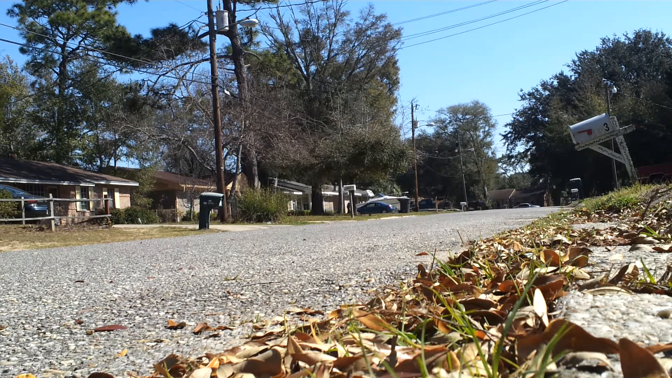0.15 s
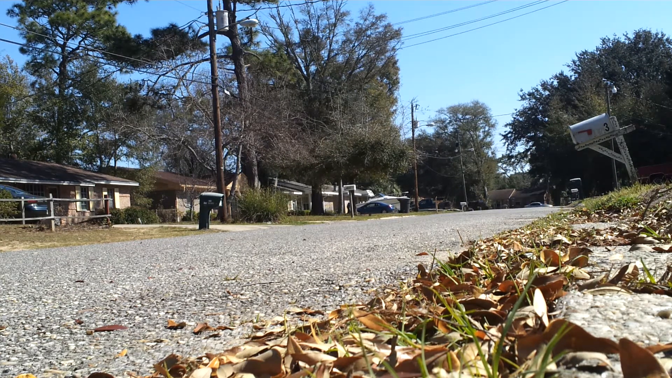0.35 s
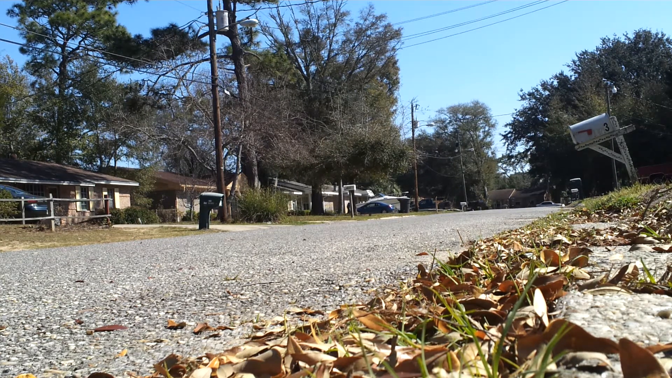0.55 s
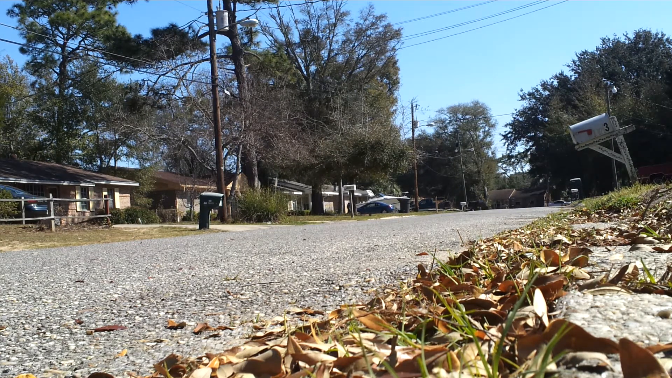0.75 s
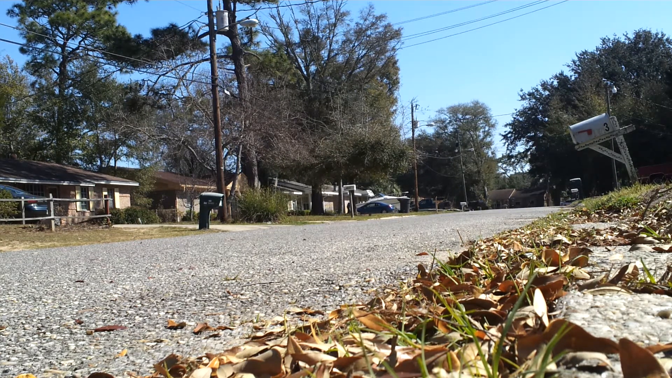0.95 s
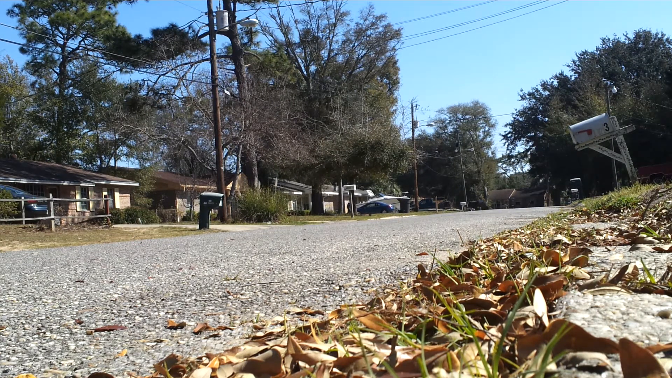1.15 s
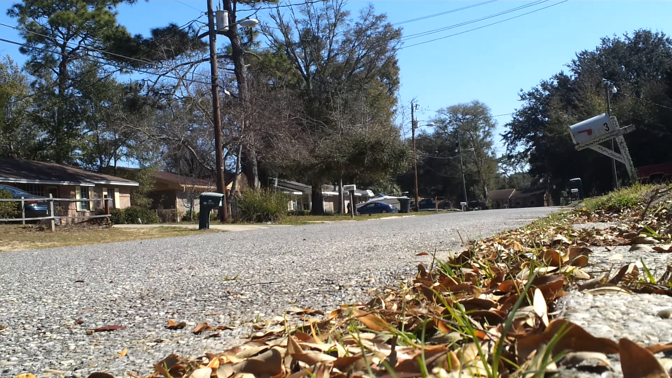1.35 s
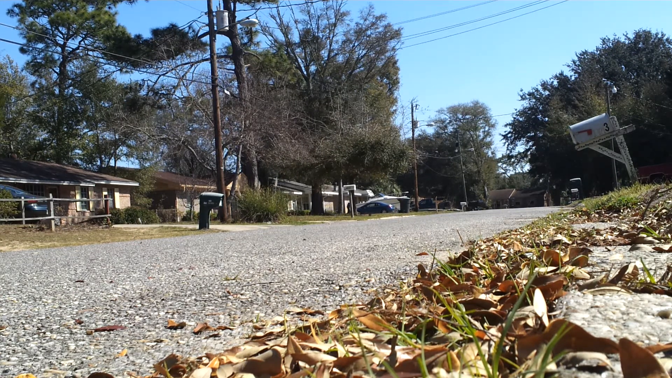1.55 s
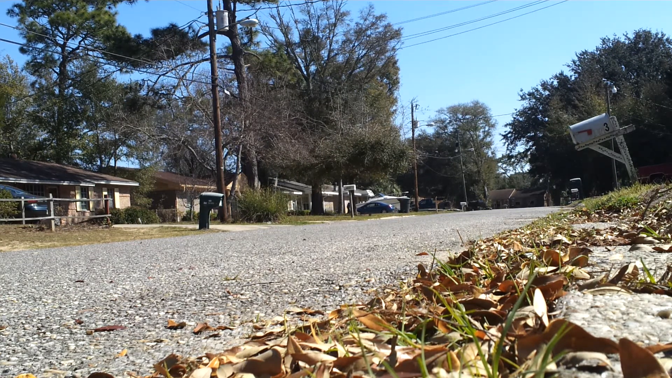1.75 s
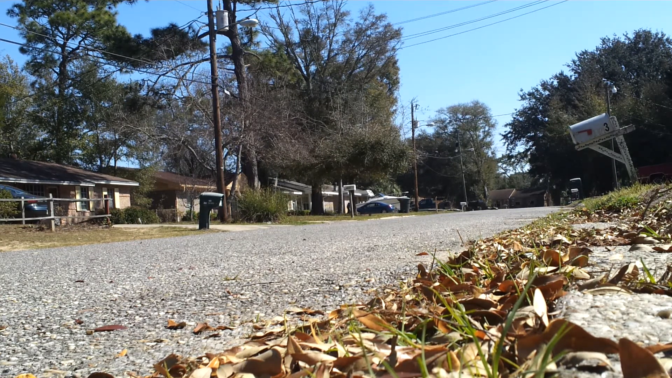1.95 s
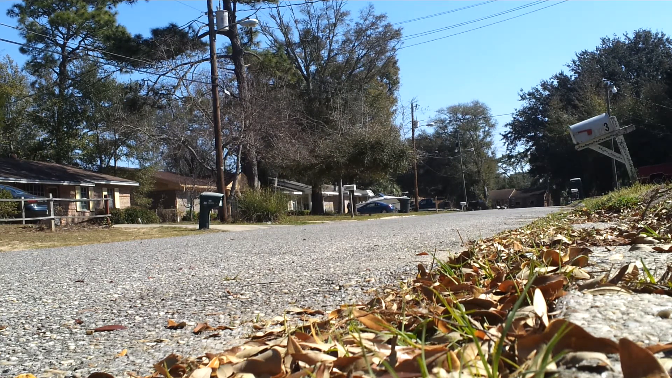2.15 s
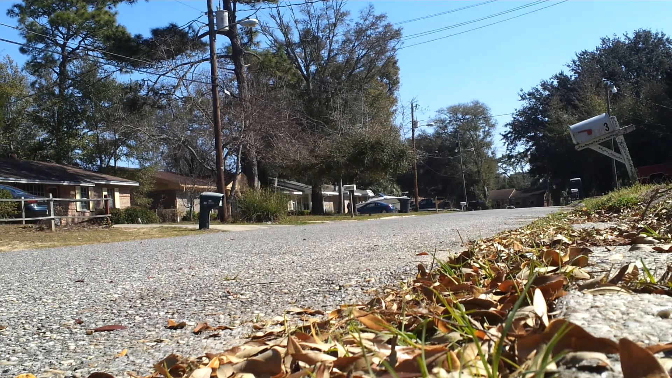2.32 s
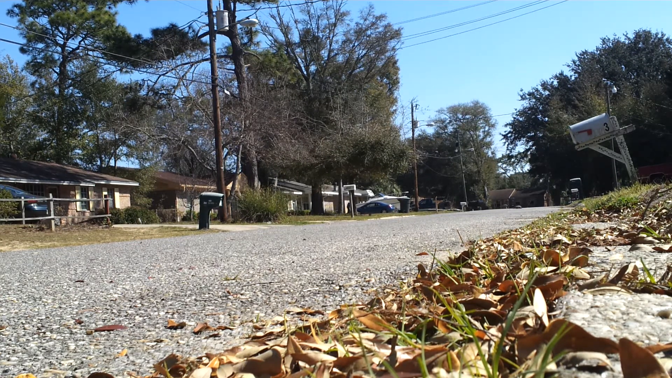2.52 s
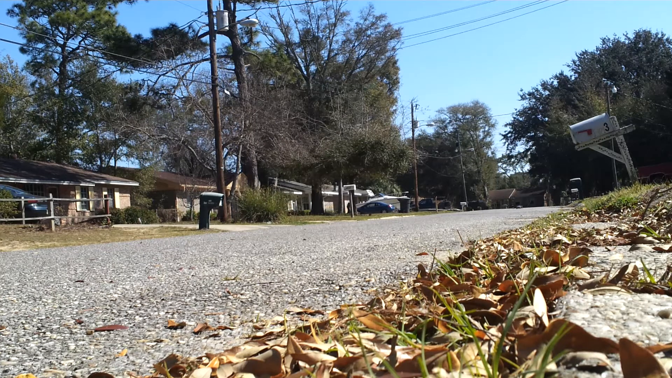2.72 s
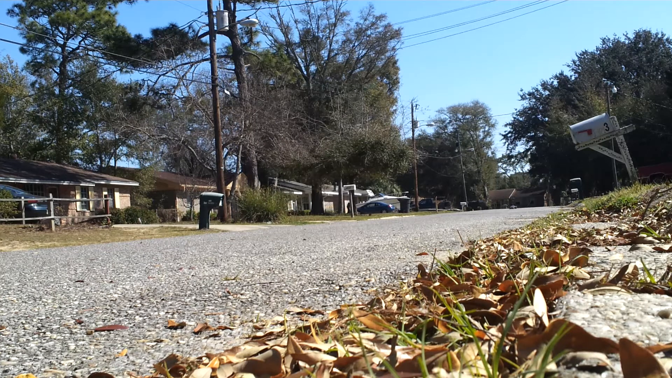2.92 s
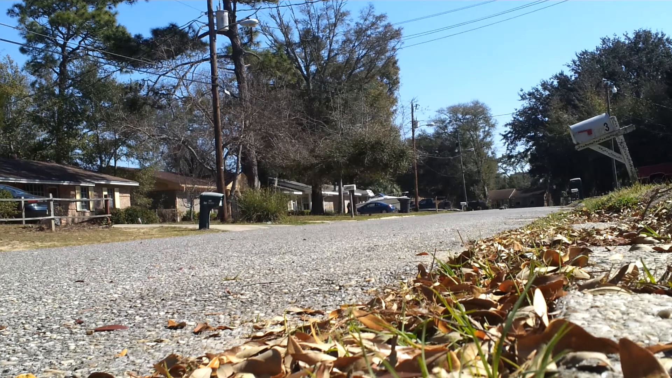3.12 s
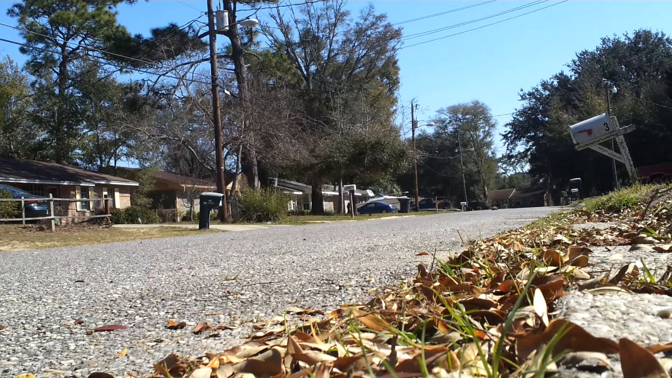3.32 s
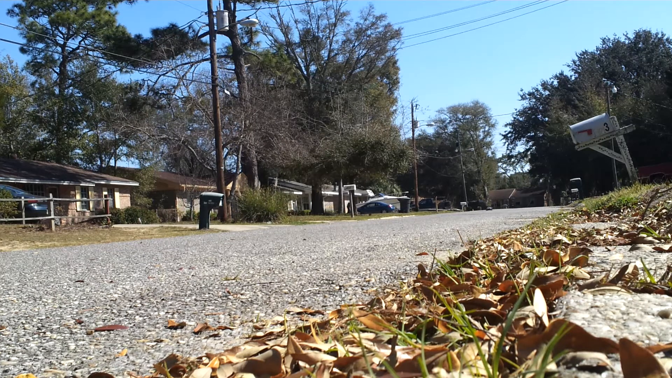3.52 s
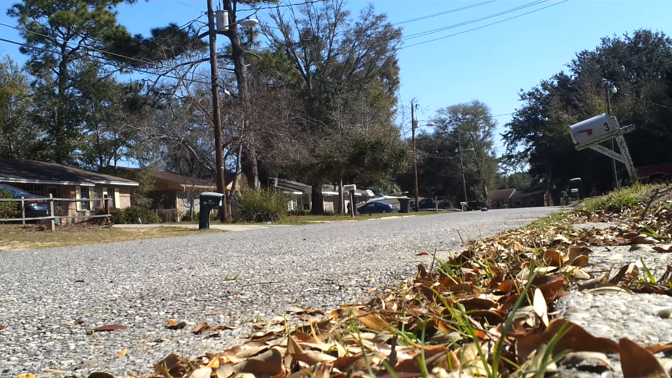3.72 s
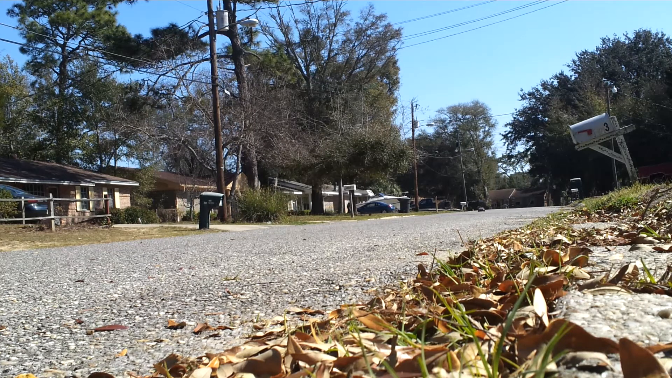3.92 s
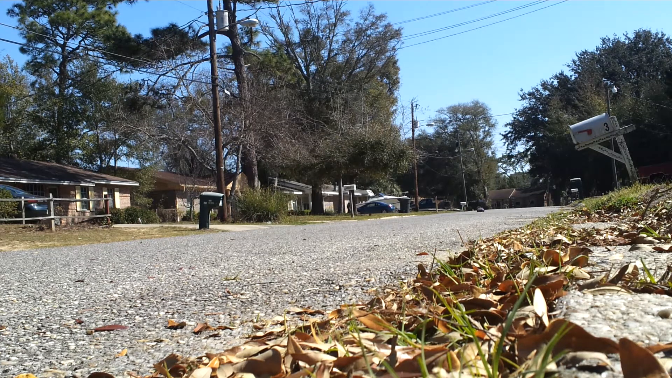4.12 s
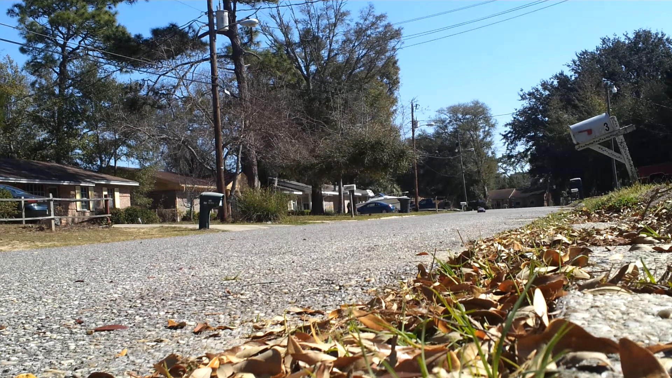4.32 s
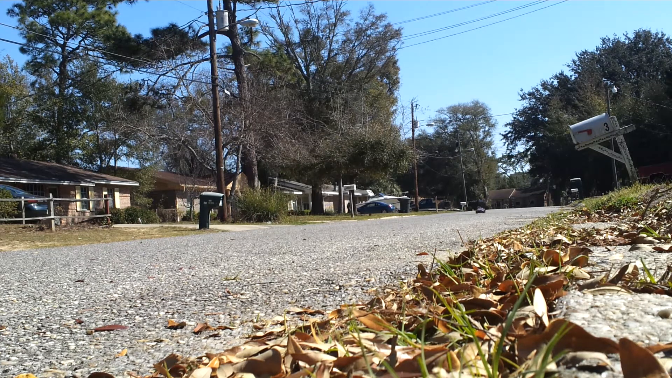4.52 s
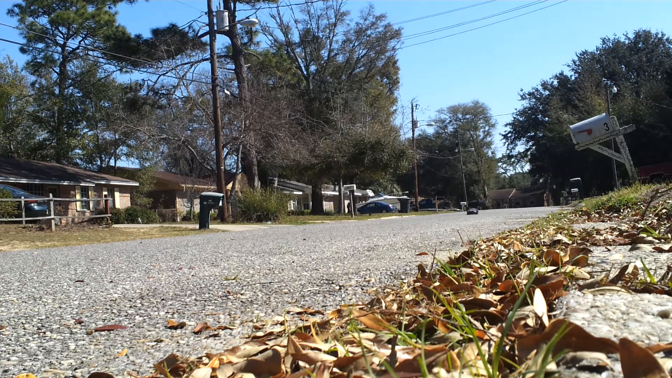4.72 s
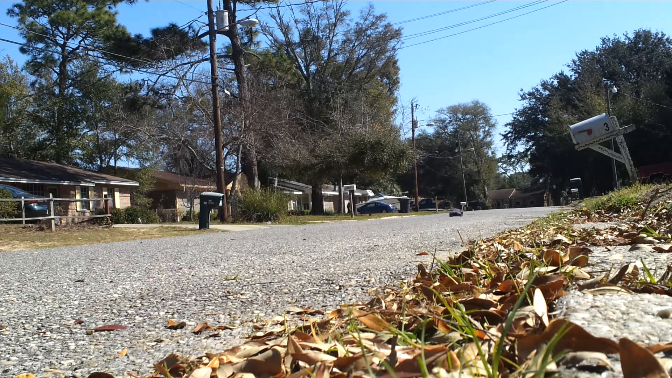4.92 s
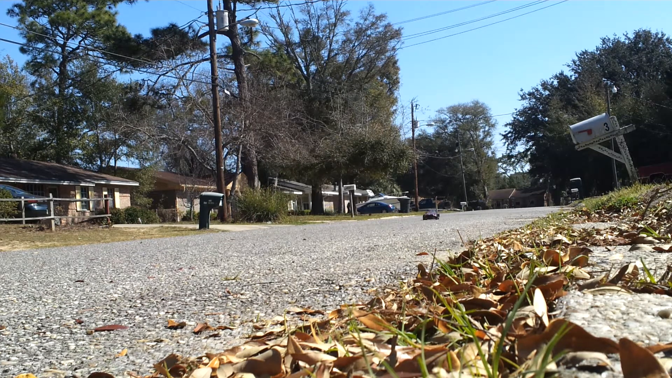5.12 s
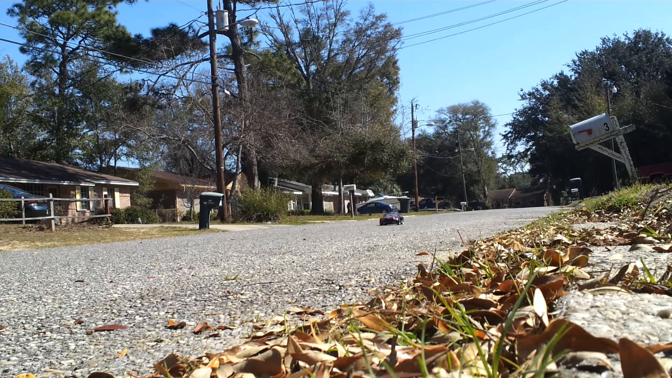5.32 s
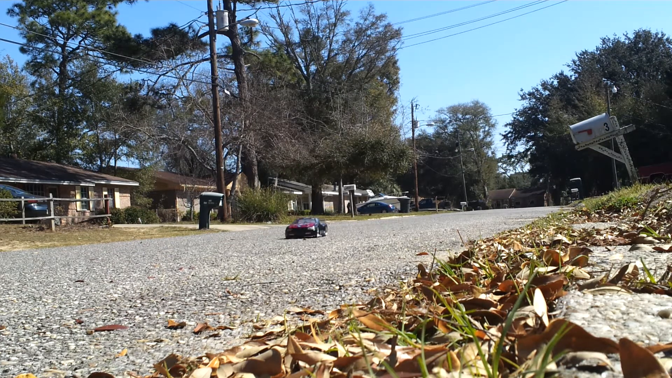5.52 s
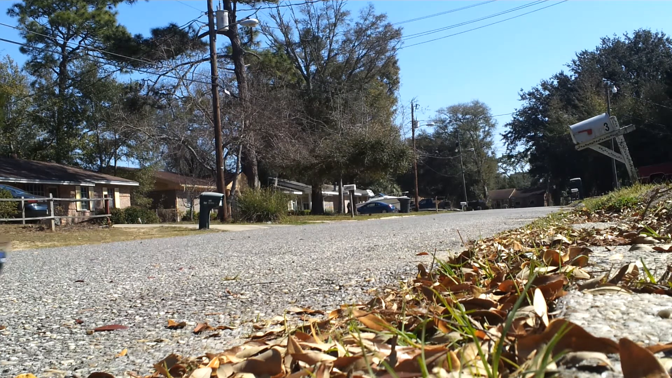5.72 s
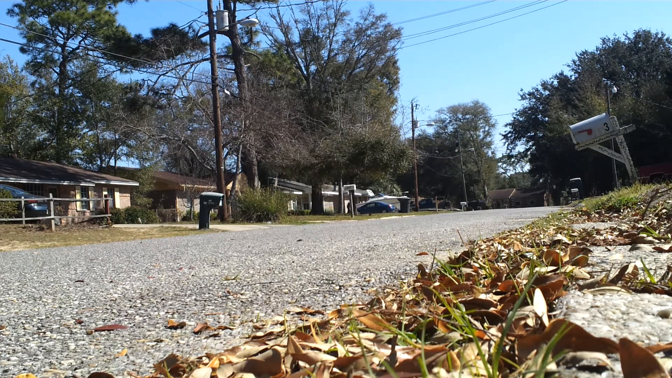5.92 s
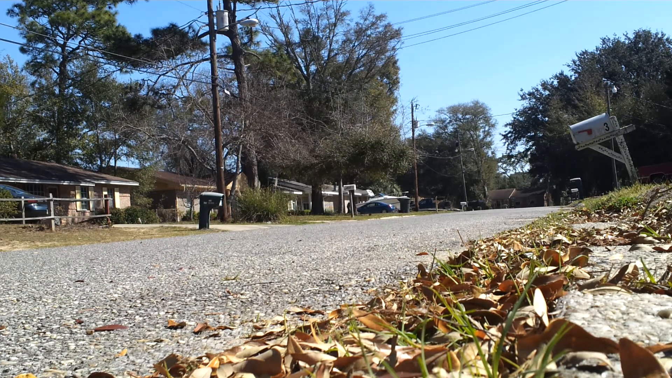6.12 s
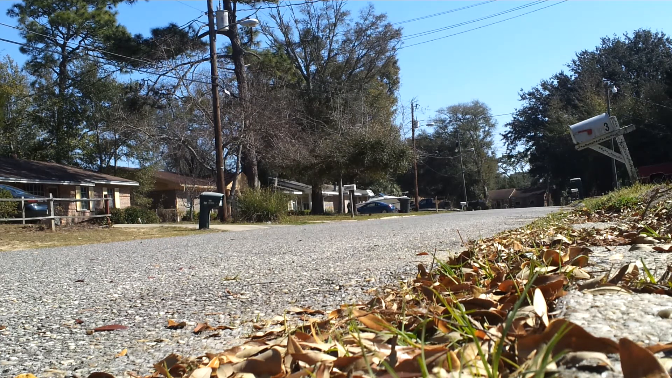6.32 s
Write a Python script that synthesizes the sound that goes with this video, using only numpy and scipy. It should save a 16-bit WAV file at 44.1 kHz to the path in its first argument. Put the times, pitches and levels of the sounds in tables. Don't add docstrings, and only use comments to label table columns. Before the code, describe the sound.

A microphone lies among dry leaves beside a rough road, with soft traffic and a machine humming far away. Crisp leaf ticks and little scrapes come in clumps. A distant toy electric truck faintly revs, then winds up and approaches, its gear whine, tyre roar and stone crunch swelling fast. It rushes past very close, drops in pitch, thuds softly with its wake, flings leaves loudly and recedes.

```python
import sys
import numpy as np
from scipy import signal
from scipy.fft import rfft, irfft, next_fast_len
from scipy.io import wavfile
from scipy.ndimage import uniform_filter1d, map_coordinates

SR = 44100
rng = np.random.default_rng(int(sys.argv[2]) if len(sys.argv) > 2 else 0)


def wav_record(signal):
    frames = np.transpose(np.atleast_2d(signal))
    bounded = np.clip(frames, -1, 1)
    quanta = np.round(bounded * 32767).astype(np.int16)
    wavfile.write(sys.argv[1], SR, quanta)


def voltage_ratio(level):
    return 10 ** (np.asarray(level, float) / 20)


N = 284886

# pitch_hz, level_db (per Hz)
TRAFFIC_COLOUR = [(15, -47), (25, -15), (123, -7), (229, -10.5), (565, -18), (875, -22), (1750, -35.5),
                  (3340, -51), (11800, -34), (15300, -71), (22000, -120)]
# time_s, second_order_db
MACHINE_LOAD = [
    (0, -54.5),
    (1.15, -54.5),
    (1.85, -42.5),
    (2.25, -48),
    (3.2, -43.5),
    (3.6, -48),
    (3.75, -58.5),
    (6.46, -62),
]
# time_s, level_db
LORRY_DRONE = [
    (0, -52),
    (1.4, -54),
    (2.0, -54),
    (3.5, -58),
    (6.46, -63),
]
# time_s, rustle_db
BREEZE_LEVEL = [(0, -57), (.29, -55), (.46, -66), (.75, -59.5), (1.3, -68), (1.85, -71), (2.1, -51),
                (2.4, -58.5), (3.1, -58.5), (3.75, -54.5), (3.95, -61), (4.5, -55.5), (5.5, -65),
                (6.12, -42), (6.46, -56)]
# pitch_hz, width_hz, level_db
RUSTLING_LEAVES = [
    (3270, 2500, -3.5),
    (4460, 960, 1.5),
    (5700, 1100, -1.5),
]
# peak_s, rise_s, fall_s, level_db, centre_hz
BROAD_SCRAPES = [(.517, .0097, 0.021, -31.5, 820), (.515, 0.0049, 0.023, -40, 2900),
                 (.572, 0.031, .014, -37.5, 4200), (.6, .043, 0.14, -46, 3440),
                 (.668, 0.0085, .017, -42, 900), (.845, .009, .008, -41, 700),
                 (.863, .0051, 0.018, -36, 990), (.915, 0.024, .02, -46, 3100),
                 (1.172, .0024, 0.03, -42, 4000), (3.37, .011, 0.011, -42.5, 3900),
                 (3.369, .0074, 0.01, -37.5, 930), (3.843, 0.0052, 0.014, -41, 1100),
                 (3.582, 0.018, .015, -38.5, 3900), (6.168, .02, .013, -24, 6500),
                 (6.17, .02, .013, -30, 1600), (.52, .006, .015, -46, 1900)]
# peak_s, rise_s, fall_s, level_db, centre_hz
FLUNG_LEAVES = [
    (6.1445, .0038, .0038, -11, 4400),
    (6.172, 0.019, 0.014, -20, 4380),
    (6.009, .0015, .002, -19, 9200),
    (6.097, .004, .005, -25, 6300),
    (6.088, .01, 0.0095, -25, 2700),
]
# start_s, peak_db, pitch_hz
FLAT_LEAVES = [(.19, -29, 4440), (.229, -24.5, 4990), (.3719, -31.5, 5000), (1.1697, -19.5, 4840),
               (1.3016, -26.5, 4500), (2.0163, -24, 5040), (2.0908, -17.5, 6570), (2.1167, -16, 4630),
               (2.2043, -22, 4550), (2.2285, -14, 4320), (2.2492, -24, 4420), (2.3309, -18.5, 4790),
               (2.4475, -23, 4700), (2.475, -27, 5250), (2.5974, -16.5, 4200), (2.6284, -28.5, 3840),
               (6.161, -2, 4120), (2.8308, -31, 4570), (2.8977, -17.5, 4420), (2.989, -29, 4550),
               (3.5903, -26, 5230), (3.8687, -24, 4430), (3.9067, -28.5, 4230), (3.9727, -25, 4730),
               (4.391, -29, 4500), (4.565, -29, 4840), (5.1452, -16, 4950), (5.3601, -16.5, 4510),
               (6.2414, -15.5, 6530), (6.2575, -18, 3430)]
# start_s, peak_db, pitch_hz
BRITTLE_LEAVES = [(.015, -23, 4570), (.0487, -31, 5300), (1.3381, -24, 4480), (1.479, -30, 4040),
                  (1.4916, -24.5, 5050), (1.9555, -22, 5400), (2.0322, -32, 4900), (2.1124, -15, 3970),
                  (2.1272, -14, 4650), (2.1796, -26, 6510), (2.1856, -19, 4900), (2.1905, -26, 5980),
                  (2.2767, -26.5, 4590), (2.3378, -23, 5640), (2.5477, -25.5, 4970), (2.64, -31, 4640),
                  (2.74, -31, 4920), (2.8654, -30, 4530), (3.0766, -26, 3560), (3.5831, -27, 5070),
                  (3.6192, -26, 5540), (3.6365, -27, 6520), (3.7493, -21, 4440), (3.7636, -29, 5910),
                  (6.2262, -19, 4860), (6.3808, -24, 3840)]
# start_s, peak_db, pitch_hz, hollow_pitch_hz
CURLED_LEAVES = [(.1082, -22, 4300, 2120), (.1319, -28.5, 4800, 1040), (.2709, -22, 5830, 2450),
                 (2.0464, -27, 4330, 1680), (2.1521, -30.5, 3900, 865), (2.2325, -14.5, 5250, 915),
                 (2.262, -28, 4840, 2030), (2.3982, -15.5, 3700, 2200), (2.998, -25, 4200, 1860),
                 (4.2283, -30, 4440, 1940), (4.4883, -25.5, 4350, 2060), (4.699, -27.5, 4550, 1450),
                 (5.092, -27, 3300, 2500), (5.3483, -14.5, 4760, 2300), (6.1453, -5.5, 4180, 2120),
                 (6.3746, -22.5, 3200, 836)]
# start_s, peak_db, pitch_hz, hollow_pitch_hz
LARGE_LEAVES = [(1.1435, -36, 4050, 2220), (2.1967, -26.5, 4300, 2220), (2.6542, -34, 3260, 1980),
                (2.6887, -31.5, 3160, 2000), (3.0598, -36, 3430, 1390), (3.0695, -34, 4000, 1400),
                (3.2198, -24, 4400, 1640), (3.369, -30.5, 3800, 1300), (3.5737, -25.5, 3550, 2400),
                (3.8406, -29.5, 4530, 1340), (3.8447, -32, 4350, 1530), (6.1724, -10, 4400, 2120)]
# start_s, peak_db, pitch_hz
FAINTER_FLAT_LEAVES = [(.3226, -35, 5120), (.39, -36, 5000), (.415, -36, 4800), (1.0265, -35, 3460),
                       (1.7272, -36, 5450), (1.912, -36, 4780), (1.9888, -35, 4320), (2.3257, -32, 4190),
                       (2.508, -34, 3880), (2.5139, -32, 4950), (2.5744, -37, 3460), (2.5929, -33, 4350),
                       (2.706, -33, 4020), (2.7166, -35, 4980), (3.4587, -32, 4060), (3.6751, -31, 4190),
                       (3.7685, -31, 4390), (4.2, -36, 3500), (4.3118, -32, 4700), (4.373, -33, 3600),
                       (4.417, -33, 3500), (6.362, -20, 5800)]
# time_s, still_to_go_m (negative once past)
TRUCK_PLACE = [(0, 21), (.5, 39), (.75, 28), (1.8, 59), (3.2, 57), (3.8, 28), (4.3, 17), (5.0, 8.5),
               (5.6, 2), (5.845, 0), (6.1, -2.5), (6.46, -6.5)]
# start_s, length_s, first_pitch_hz, last_pitch_hz, level_db
THROTTLE_SQUEEZES = [
    (1.377, .09, 3600, 3250, -53),
    (1.51, .17, 3420, 3300, -57),
    (1.7, .2, 3280, 3150, -64),
    (3.06, .8, 4900, 7500, -47),
]
# time_s, pitch_hz
WHINE_PITCH = [
    (4.1, 5250),
    (5.1, 5250),
    (5.4, 5700),
    (5.7, 6200),
    (5.78, 5900),
    (5.83, 5150),
    (5.91, 5910),
    (5.96, 6380),
    (6.05, 6470),
]
# pitch_hz, level_db (per Hz)
TYRE_COLOUR = [(60, -47), (170, -15.5), (230, -18), (360, -8.5), (440, -6), (520, -1), (580, -5.5),
               (660, 0), (900, -3.5), (1060, -4), (1270, -13.5), (1750, -17), (3000, -26)]
# pitch_hz, level_db (per Hz)
STONE_COLOUR = [(500, -27), (1200, -4.5), (1600, -3.5), (2400, -0.5), (3600, -1), (5000, -4.5), (9000, -30)]
# pitch_hz, level_db (per Hz)
SPRAY_COLOUR = [(4000, -15), (7000, 2.5), (10000, 0), (11600, 0), (12500, -38), (15800, -32)]
# pitch_hz, level_db (per Hz)
SHELL_COLOUR = [(3000, -25), (4450, -10.5), (4780, 1), (5200, -3.5), (5700, -4.5), (6300, -9), (8500, -20)]

PASS_S = 5.9
MISS_M = 0.49
DOPPLER = 0.027


def unit(x):
    return x / np.sqrt(np.mean(x ** 2) + 1e-20)


def curves(rows):
    s, *columns = np.transpose(rows)
    return [np.interp(np.arange(N) / SR, s, column) for column in columns]


def wobble(rate):
    knots = rng.standard_normal(int(N * rate / SR) + 4)
    return map_coordinates(knots, [np.arange(N) * rate / SR])


def filtered(x, response):
    m = next_fast_len(len(x) + 8192)
    spectrum = rfft(x, m) * response(np.fft.rfftfreq(m, 1 / SR))
    return unit(irfft(spectrum, m)[:len(x)])


def colour(points):
    f, db = np.transpose(points)
    return lambda hz: voltage_ratio(np.interp(np.log(hz + 1), np.log(f), db, left=-120, right=-120))


def lowered(points):
    return lambda hz: colour(points)(hz * (1 + DOPPLER) / (1 - DOPPLER))


def peak(f, centre_hz, width_hz):
    return 1j * f * width_hz / (centre_hz ** 2 - f * f + 1j * f * width_hz)


def grit(size, spiky_db):
    return rng.standard_normal(size) * voltage_ratio(spiky_db * rng.exponential(size=size))


def smeared(hz, smear_hz):
    turn = 2 * np.pi * np.cumsum(hz) / SR
    return wobble(smear_hz) * np.cos(turn) + wobble(smear_hz) * np.sin(turn)


def heard(close_db, coming, leaving, carried_db, far_db):
    ahead_m, = curves(TRUCK_PLACE)
    breeze_db, = curves(BREEZE_LEVEL)
    spread = MISS_M / np.hypot(MISS_M, ahead_m)
    direct = voltage_ratio(close_db) * spread ** np.where(ahead_m > 0, coming, leaving)
    carried = voltage_ratio(carried_db) * spread * (ahead_m > 0)
    hiss = voltage_ratio(far_db + 0.5 * (breeze_db + 59))
    return np.hypot(np.hypot(direct, carried), hiss)


def distance():
    second_db, = curves(MACHINE_LOAD)
    turn = 2 * np.pi * np.cumsum(61.5 + 0.25 * wobble(3.78)) / SR
    first = voltage_ratio(-56 + 0.4 * (second_db + 49.5) + 2.1 * wobble(8.8)) * np.sin(turn)
    second = voltage_ratio(second_db + 1.5 + 0.39 * wobble(5.9)) * np.sin(2 * turn)
    wake = voltage_ratio(-38.5) * np.exp(-((np.arange(N) / SR - 5.87) / 0.053) ** 2)
    lorry = voltage_ratio(curves(LORRY_DRONE)[0] + 1.5 * wobble(2.5))
    drone = (lorry + wake) * filtered(rng.standard_normal(N), lambda f: peak(f, 97, 25) ** 2)
    traffic = voltage_ratio(-50.5 + 0.53 * wobble(2.4)) * filtered(rng.standard_normal(N), colour(TRAFFIC_COLOUR))
    return first + second + drone + traffic


def rustle():
    chance = 160 / SR * voltage_ratio(3.4 * wobble(14))
    total = np.zeros(N)
    for hz, width_hz, db in RUSTLING_LEAVES:
        impacts = (rng.random(N) < chance) * grit(N, spiky_db=1.0)
        total += voltage_ratio(db) * filtered(impacts, lambda f: peak(f, hz, width_hz) ** 2)
    return voltage_ratio(curves(BREEZE_LEVEL)[0] - 4.0) * total


def scrapes():
    out, t = np.zeros(N + SR), np.arange(-SR // 10, SR // 5) / SR
    rows = [(*row, 1.45) for row in BROAD_SCRAPES] + [(*row, 0.61) for row in FLUNG_LEAVES]
    for s, rise, fall, db, hz, width in rows:
        ringing = lambda f: peak(f, hz, width * hz) ** 2 / (1 + (f / (2.24 * hz)) ** 4)
        body = filtered(grit(len(t), spiky_db=2.5), ringing)
        swell = np.where(t < 0, np.exp(-(t / rise) ** 2), np.exp(-t / fall))
        out[round(s * SR) - SR // 10:][:len(t)] += voltage_ratio(db) * swell * body
    return out[:N]


def ring(hz, cycles):
    t = np.arange(256) / SR
    return np.sin(2 * np.pi * hz * t) * np.exp(-t * hz / cycles) * (1 - np.exp(-t / 0.00008))


def ticks():
    out = np.zeros(N + 512)
    # its ticks, brittle_db, hollow_db
    kinds = [(FLAT_LEAVES, -21, -24), (BRITTLE_LEAVES, -7.5, -28), (CURLED_LEAVES, -24, -9),
             (LARGE_LEAVES, -6, -2.7), (FAINTER_FLAT_LEAVES, -20, -25)]
    for rows, brittle_db, hollow_db in kinds:
        for s, db, hz, *rest in rows:
            hollow_hz = rest[0] if rest else hz / 2.5
            u = rng.random(3)
            brittle = ring(9000 + 2200 * u[0], 1.6)
            hollow = ring(hollow_hz, 0.95)
            snap = ring(hz, 1.56) - voltage_ratio(brittle_db + 4.5) * brittle - voltage_ratio(hollow_db + 1.0) * hollow
            echo_s = s + 0.0005 + 0.0012 * u[1]
            out[round(s * SR):][:len(snap)] += voltage_ratio(db + 5.5) * snap
            out[round(echo_s * SR):][:len(snap)] += voltage_ratio(db + 1.0 - 5.5 * u[2]) * snap
    return out[:N]


def whine():
    t = np.arange(N) / SR
    start_s, end_s = WHINE_PITCH[0][0], WHINE_PITCH[-1][0]
    engaged = np.interp(t, [start_s, start_s + 0.4, end_s - 0.07, end_s], [0, 1, 1, 0])
    teeth = heard(close_db=-11, coming=1.9, leaving=1.5, carried_db=-26, far_db=-90)
    out = engaged * teeth * smeared(curves(WHINE_PITCH)[0], 850)
    for (s, length, first_hz, last_hz, db), smear_hz in zip(THROTTLE_SQUEEZES, (350, 280, 280, 1100)):
        u = np.clip((t - s) / length, 0, 1)
        squeeze = np.minimum(u / 0.18, 1) * voltage_ratio(db - 13 * u) * np.minimum(8 * (1 - u), 1)
        out += squeeze * smeared(first_hz * (last_hz / first_hz) ** u, smear_hz)
    return out


def truck():
    t = np.arange(N) / SR
    jolt = 1.44 * wobble(70) + 0.47 * wobble(220)
    past = 0.5 + 0.5 * np.tanh((t - PASS_S) / 0.032)
    stones = heard(close_db=-15.5, coming=1.7, leaving=1.25, carried_db=-26.5, far_db=-58.5)
    gravel = stones * voltage_ratio(jolt) * filtered(grit(N, spiky_db=2.0), colour(STONE_COLOUR))
    spray = heard(close_db=-17.5, coming=1.8, leaving=1.45, carried_db=-42, far_db=-62.5)
    fizz = spray * voltage_ratio(jolt) * filtered(grit(N, spiky_db=2.2), colour(SPRAY_COLOUR))

    tread_coming = filtered(grit(N, spiky_db=1.56), colour(TYRE_COLOUR))
    tread_leaving = filtered(grit(N, spiky_db=1.8), lowered(TYRE_COLOUR))
    tread = np.sqrt(1 - past) * tread_coming + np.sqrt(past) * tread_leaving
    tyres = heard(close_db=-15, coming=1, leaving=0.98, carried_db=-40, far_db=-65)
    roar = tyres * voltage_ratio(1.17 * wobble(40)) * tread

    facing = np.clip((t - 3.8) / 0.32, 0, 1)
    blurred = filtered(grit(N, spiky_db=2.5), lambda f: peak(f, 5030, 2300) ** 2)
    shell_coming = filtered(grit(N, spiky_db=1.6), colour(SHELL_COLOUR))
    shell_leaving = filtered(grit(N, spiky_db=1.9), lambda f: lowered(SHELL_COLOUR)(f) ** 1.35)
    shell = np.sqrt(1 - past) * shell_coming + np.sqrt(past) * shell_leaving
    gearbox = heard(close_db=-6.5, coming=1.6, leaving=1.75, carried_db=-22.5, far_db=-59.5)
    gears = gearbox * voltage_ratio(jolt - 2.15) * (np.sqrt(1 - facing) * blurred + np.sqrt(facing) * shell)

    brief_dip = voltage_ratio(-8 * np.exp(-((t - 6.125) / 0.012) ** 2))
    return roar + brief_dip * (gravel + fizz + gears)


def scene():
    background = distance() + rustle()
    leaves = scrapes() + ticks()
    return (background + leaves + whine() + truck())[None]


def masked(x, below_db):
    hz, _, z = signal.stft(x, SR, nperseg=2048)
    power = np.abs(z) ** 2
    middle = power[:, hz > 400].sum(axis=1, keepdims=True)
    faint = uniform_filter1d(power, size=7, axis=1) < middle * voltage_ratio(2 * below_db)
    kept = z * ~(faint & (hz > 8600)[:, None])
    return signal.istft(kept, SR, nperseg=2048)[1][:, :N]


def low_pass(x):
    return signal.sosfilt(signal.butter(12, 15960, fs=SR, output="sos"), x)


def record(dry):
    flattened = dry / (1 + np.abs(dry / 0.66) ** 8) ** (1 / 8)
    spectrum, hz = rfft(flattened), np.fft.rfftfreq(N, 1 / SR)
    split_hz = 11760
    lower = masked(irfft(spectrum * (hz < split_hz), N), below_db=-46.3)
    top = voltage_ratio(-9.5) * irfft(spectrum * (hz >= split_hz) * (hz < 15800), N)
    level = np.sqrt(np.abs(uniform_filter1d(flattened ** 2, size=3000)))
    top_open = uniform_filter1d((level > voltage_ratio(-11.8)) * 1.0, size=600)
    return low_pass(lower + top_open * top)


dry = scene()
out = record(dry)
wav_record(out)
```